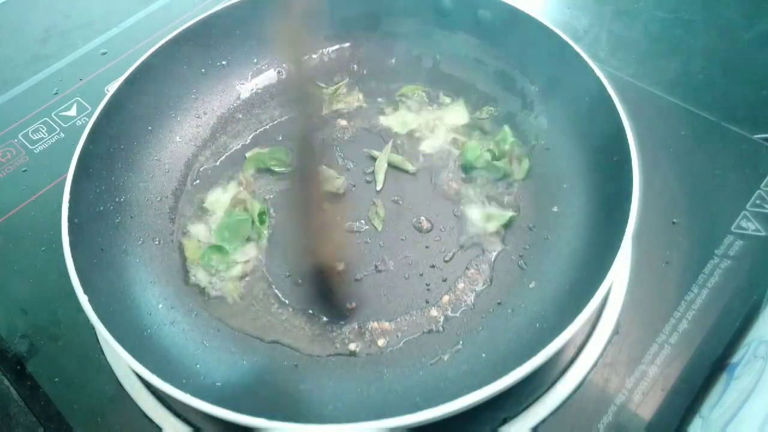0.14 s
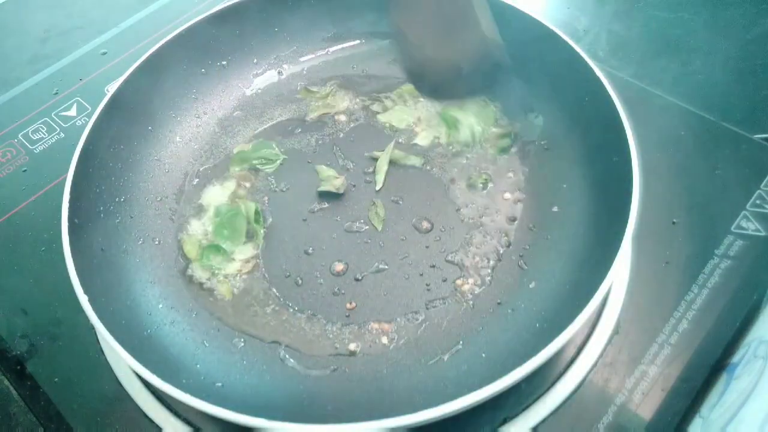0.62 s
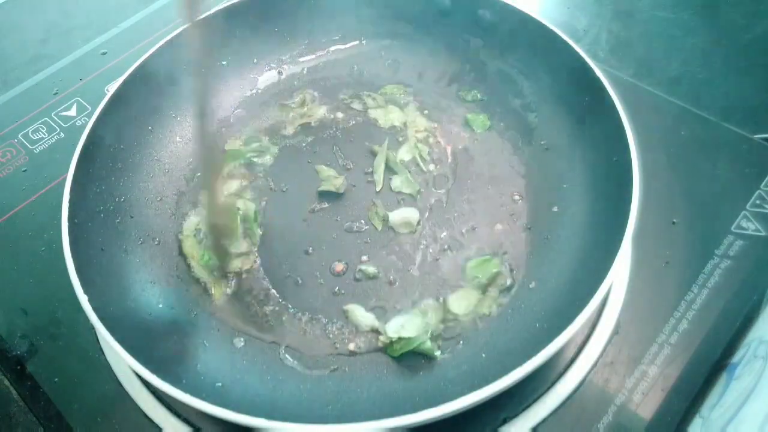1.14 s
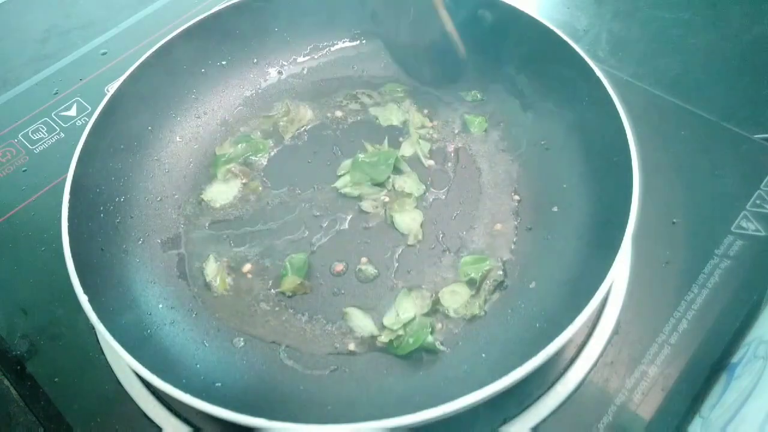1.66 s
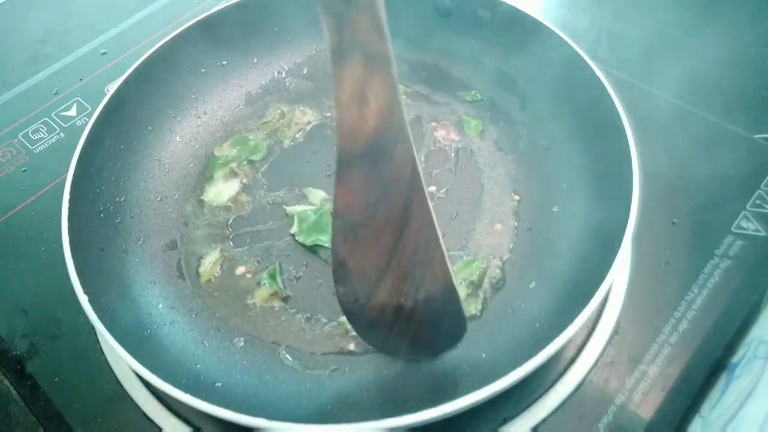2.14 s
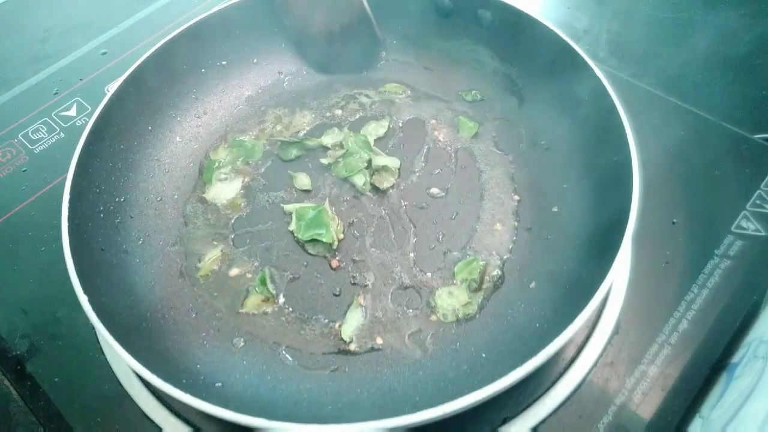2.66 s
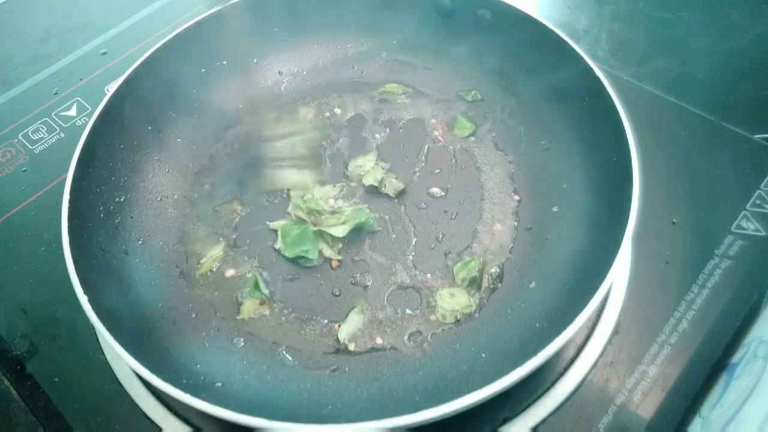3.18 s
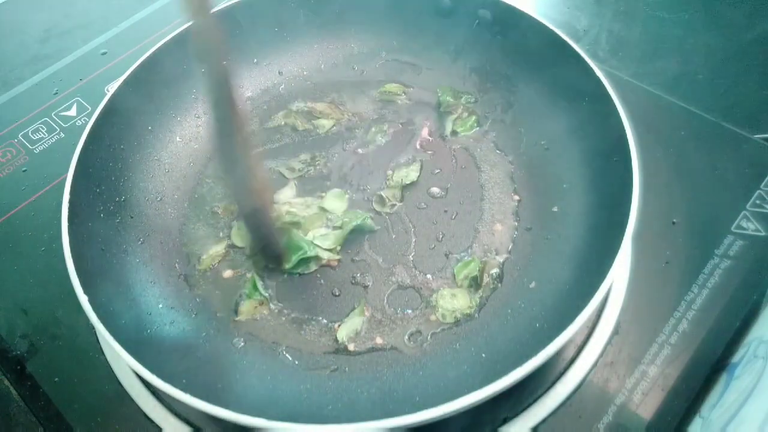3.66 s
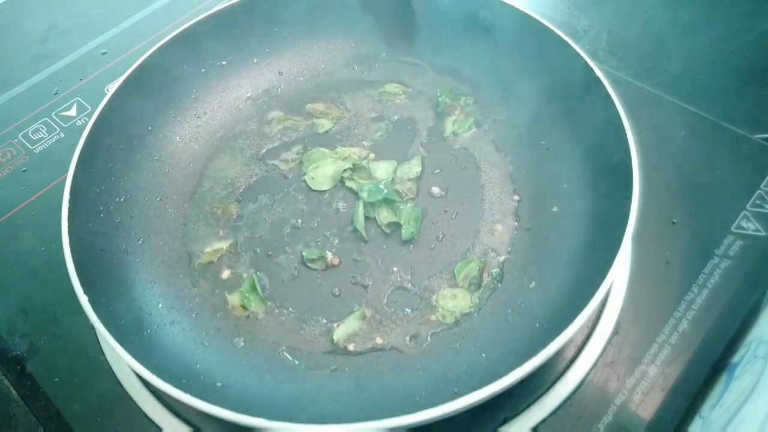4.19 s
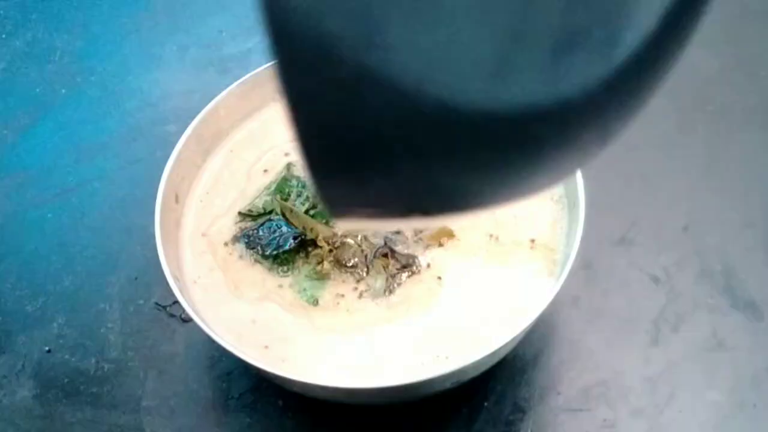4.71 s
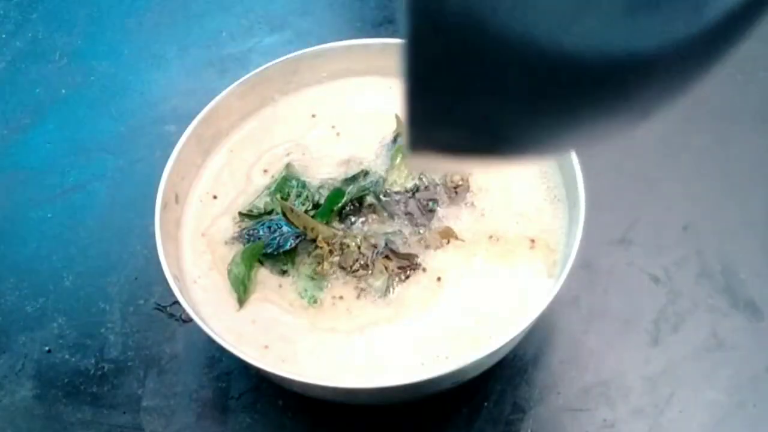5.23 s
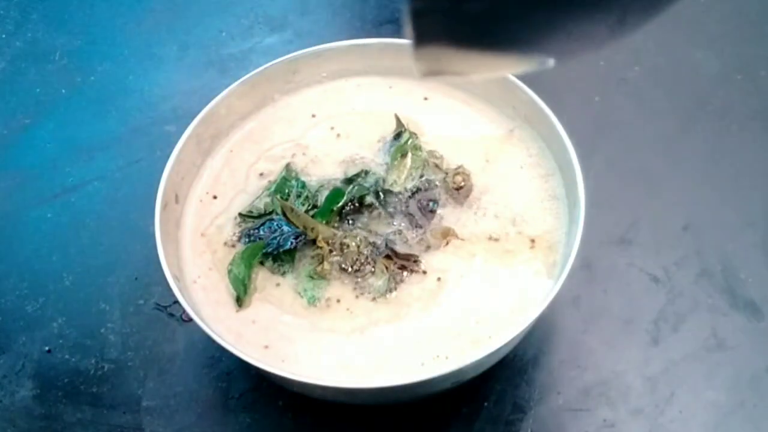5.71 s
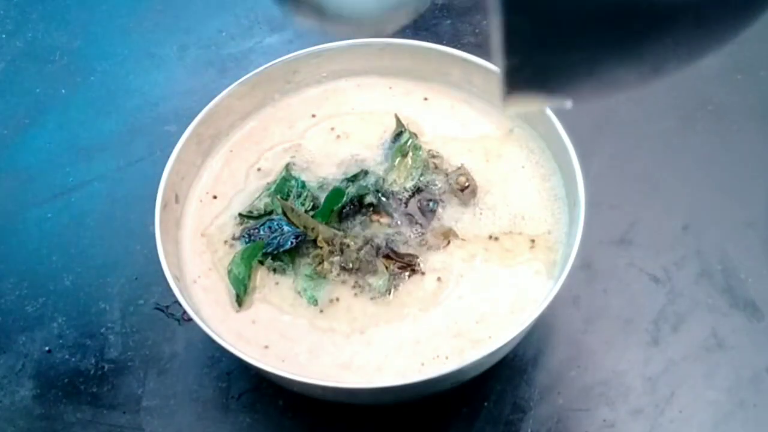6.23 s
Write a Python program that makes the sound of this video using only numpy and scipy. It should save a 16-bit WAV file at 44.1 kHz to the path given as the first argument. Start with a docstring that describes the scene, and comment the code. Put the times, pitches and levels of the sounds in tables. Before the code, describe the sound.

Lively crackling frying with dry wooden taps on a pan fades and cuts to quieter steel clinks and raspy scraping over a bowl.

```python
"""Kitchen, electric hob: spices and leaves fry in a pan. Oil fizzes (noise in random grains), water pockets pop
(short sine bursts), a wooden spatula knocks the pan (decaying modes), the hob fan hums (noise and harmonics).
This fades out; then, quieter, the pan is scraped out over a steel bowl off to the right (jolts through resonances).
Two microphone ports a few centimetres apart, dull above 8 kHz."""
import sys
import numpy as np
from scipy import signal
from scipy.fft import rfft, irfft, next_fast_len
from scipy.io import wavfile
from scipy.ndimage import uniform_filter1d, map_coordinates

SR = 44100
rng = np.random.default_rng(int(sys.argv[2]) if len(sys.argv) > 2 else 0)


def gain_from_db(level_db):
    """Convert decibel levels to linear amplitude factors (20 dB per decade)."""
    decades = np.asarray(level_db, float) / 20
    return 10 ** decades


def master(y):
    """Save y as 16-bit WAV."""
    cut = np.clip(np.atleast_2d(y).T, -1, 1)
    pcm = np.round(cut * 32767)  # scale
    wavfile.write(sys.argv[1], SR, pcm.astype(np.int16))


N = 280016
T = np.arange(N) / SR
PORT_LAG_S = 0.00012
CUT_S, BOWL_FROM_S = 4.678, 4.697  # frying ends, bowl starts

# bright snaps of bursting water pockets: (time [s], relative level [dB], pitch [Hz], left minus right [dB])
SNAPS = [(0.0059, -17.5, 4820, 18.5), (0.0353, -31, 7110, 1), (0.045, -14, 4630, 2),
         (0.129, -16.5, 6700, -5), (0.1407, -22, 6550, -8), (0.1422, -13, 6450, -23.5),
         (0.1474, -26, 6850, -10), (0.1843, -15, 6120, -2.5), (0.219, -25, 6850, -4.5),
         (0.236, -17, 5990, 1), (0.2467, -11.5, 6180, -18), (0.2501, -14, 6200, 4.5),
         (0.2536, -10, 6240, 0.5), (0.2694, -8.5, 7000, -1.5), (0.3294, -4.5, 5540, 0.5),
         (0.407, -19.5, 6940, -15.5), (0.417, -19.5, 7700, -11), (0.43, -28.5, 7240, -9),
         (0.4859, -15, 4700, 5), (0.5033, -27.5, 6440, -4), (0.5066, -19.5, 7050, 3),
         (0.56, -19, 4910, -16.5), (0.57, -28.5, 4870, -13), (0.61, -22.5, 7040, -8),
         (0.6274, -29.5, 5800, -17), (0.652, -35.5, 5900, -18), (0.658, -48.5, 6850, -19),
         (0.7336, -17.5, 5560, -13), (0.7379, -8.5, 5900, 2), (0.7922, -16, 6400, -2),
         (0.847, -23, 5900, -15), (0.8782, -20, 6200, -15), (0.913, -8, 5650, 3), (1.0055, -12.5, 6680, -4),
         (1.0518, -17, 6260, -4.5), (1.069, -7, 6220, -3), (1.0895, -17.5, 7000, -10.5),
         (1.128, -19, 4430, 3), (1.1386, -24, 6560, -4.5), (1.147, -17, 5300, -1), (1.174, -17, 4480, -9.5),
         (1.219, -25.5, 6300, -13), (1.241, -44, 6590, -7), (1.322, -14.5, 7040, -1),
         (1.3402, -11.5, 5700, 4), (1.3697, -33, 6360, -4), (1.3824, -33, 6350, -6.5),
         (1.3986, -42, 5750, -4), (1.439, -23.5, 6350, -1.5), (1.464, -30.5, 5770, -2),
         (1.498, -29.5, 5750, -9.5), (1.5052, -33.5, 7000, -10.5), (1.5472, -15, 6700, -5.5),
         (1.567, -17.5, 5860, 1.5), (1.5938, -23, 6500, 15.5), (1.6114, -24.5, 7000, -4.5),
         (1.6355, -30.5, 5030, 3.5), (1.6513, -5, 4800, -1), (1.7439, -18, 7440, -10),
         (1.765, -13.5, 6600, 8), (1.7715, -16.5, 5730, 5), (1.792, -27.5, 6440, 2.5),
         (1.8226, -18.5, 6140, 5), (1.872, -19.5, 5400, 1.5), (1.8747, -27.5, 5600, -1),
         (1.8868, -30.5, 5800, -6), (1.8903, -30, 6800, -5.5), (1.963, -29, 6870, -1),
         (1.9867, -23.5, 6400, 2.5), (1.993, -22, 4840, -2.5), (2.0104, -31, 7200, -6),
         (2.0676, -30, 6600, -15), (2.123, -25.5, 7260, -4), (2.143, -22.5, 6400, -4),
         (2.208, -23, 6700, -10), (2.2625, -25.5, 6040, 0), (2.2708, -21, 7100, -3.5),
         (2.2943, -12, 7150, -6), (2.322, -13.5, 7600, 17), (2.366, -24, 7050, -4), (2.403, -25, 7100, -11),
         (2.4763, -31.5, 6000, -17), (2.5686, -28.5, 6480, -14), (2.594, -27.5, 7360, -2),
         (2.6252, -26.5, 7260, -16), (2.6513, -25, 6550, -8), (2.6552, -18, 5170, -11),
         (2.661, -19.5, 5160, -13), (2.6645, -16, 7000, -8), (2.7084, -17, 5150, -3.5),
         (2.7148, -23.5, 6200, -21), (2.7893, -14, 5900, -19), (2.801, -28.5, 4800, -14),
         (2.8761, -35.5, 6500, -11), (2.946, -36, 6960, -6.5), (2.9614, -38, 6800, 1.5),
         (2.9756, -21, 6870, -3), (3.005, -15.5, 4800, 5.5), (3.013, -17, 4830, 0.5),
         (3.0523, -21, 5900, -12), (3.1137, -10, 5400, -5), (3.1139, -17.5, 7160, -5),
         (3.133, -20, 6400, -8), (3.235, -19, 6430, -12), (3.2514, -14, 5800, 0), (3.2969, -19, 7600, -13),
         (3.3632, -34.5, 5470, -12.5), (3.42, -15, 5200, 10), (3.422, -13.5, 7000, -6),
         (3.468, -23.5, 5170, 10), (3.4913, -31, 6100, -8), (3.4994, -24, 7300, -18),
         (3.5492, -15.5, 7040, -12), (3.563, -16.5, 4360, -4), (3.5946, -14, 5230, 7.5),
         (3.6016, -11.5, 6270, -5), (3.606, -25, 6270, -3), (3.6742, -21.5, 7170, -16),
         (3.6934, -36, 6900, -11), (3.7012, -30, 5900, -15), (3.732, -35, 6700, -15),
         (3.778, -34, 7000, -13), (3.802, -30, 6500, -4), (3.8083, -17.5, 6650, 0),
         (3.844, -15, 7600, -2.5), (3.852, -18.5, 4620, 5), (3.873, -19, 6700, -15),
         (3.9542, -31, 7000, -20), (3.99, -25, 7150, -6), (4.0125, -32.5, 6230, -13),
         (4.0339, -26, 6600, -9.5), (4.038, -21, 4780, 7), (4.106, -40, 6600, -12),
         (4.1841, -33, 6970, -11), (4.1996, -27.5, 4350, 7), (4.2191, -19, 7000, -2),
         (4.283, -30.5, 6870, -5), (4.3343, -40.5, 7080, -14), (4.341, -46, 5300, -10),
         (4.3637, -29.5, 6120, -7), (4.3756, -33.5, 6680, -14), (4.4744, -44, 7020, -8),
         (4.5687, -53, 7340, -10), (4.593, -66, 6130, -16), (5.3057, -35.5, 6980, -5),
         (5.502, -31, 5640, -6), (5.522, -25, 7340, -6), (5.623, -28.5, 4930, 1), (6.163, -43, 7240, -13),
         (6.192, -38, 7600, -10), (6.302, -32.5, 7600, -5)]
# notes of the pan's bottom: (frequency [Hz], relative level [dB], t60 [s])
PAN_BOTTOM = [(303, -8, .1), (336, 0, .14), (405, -4, .1)]
# ring modes of the pan: (frequency [Hz], relative level [dB], t60 [s])
PAN_MODES = [(481, 1, 0.044), (583, -7.5, 0.18), (699.2, -6.5, 0.33), (748, -6.5, 0.17), (876.5, -7, 0.13),
             (960, -9, 0.12), (1010, -7.5, 0.18), (1300, -7.5, 0.099), (1382, -7, 0.13),
             (2240, -14.5, 0.21)]
# steel bowl, main note: (frequency [Hz], width [Hz], relative level [dB])
BOWL = [(1347, 8, 0), (1375, 18, -8), (1250, 200, -8), (1530, 80, -14), (969, 30, -10), (797, 20, -14)]
# steel bowl, overtones: (frequency [Hz], width [Hz], relative level [dB])
BOWL_HIGH = [(2905, 25, -2), (3390, 36, -10), (4770, 55, -4), (5300, 33, 0), (6670, 45, -5),
             (2510, 86, -18)]


def read(table):
    """Columns of a curve per sample."""
    s, *columns = np.transpose(table)
    return [np.interp(T, s, c) for c in columns]


def unit(x):
    """Scale to rms 1."""
    return x / np.sqrt(np.mean(x ** 2))


def colour(x, points, lag_s=0.):
    """Shape by (Hz, dB) points, log-frequency interpolation, and delay."""
    size = next_fast_len(N)
    hz = np.arange(size // 2 + 1) * SR / size + 0.00087  # offset avoids log(0)
    f, db = np.transpose(points)
    gain = gain_from_db(np.interp(np.log(hz), np.log(f), db))
    delay = np.exp(-2j * np.pi * hz * lag_s)
    return irfft(rfft(x, size) * gain * delay, size)[..., :N]


def ring(x, hz, width_hz):
    """One resonance, gain 1 at its centre."""
    return signal.lfilter(*signal.iirpeak(hz, hz / width_hz, SR), x)


def walk(rate_hz):
    """Random level in straight ramps, a new target every 1 / rate_hz; spread near 1."""
    k = int(SR / rate_hz)
    return uniform_filter1d(np.repeat(rng.standard_normal(N // k + 1), k), k)[:N]


def sides(pan_db):
    """Gains of the two ports (left minus right in dB), mean 1."""
    gain = gain_from_db(np.array([pan_db, -pan_db]).reshape(2, -1) / 2)
    return gain / gain.mean(0)


def ports(points, alike):
    """Coloured noise: a share reaches both ports, the left one later; the rest is each port's own."""
    shared, own = rng.standard_normal(N), rng.standard_normal((2, N))
    alike = np.clip(alike, 0, 1)
    both = np.array([colour(shared, points, PORT_LAG_S), colour(shared, points)])
    return unit(np.sqrt(alike) * both + np.sqrt(1 - alike) * colour(own, points))


def bubbles(rate_hz, spread_db, tail_s):
    """Envelope of many small bursts of very uneven size, rms 1."""
    size = (rng.random(N) < rate_hz / SR) * gain_from_db(spread_db * rng.exponential(size=N))
    swell = uniform_filter1d(size ** 2, int(tail_s * SR / 3)).clip(0)
    power = signal.lfilter([1], [1, -np.exp(-2 / (tail_s * SR))], swell)
    return unit(np.sqrt(power))


def burst(t, rise_s):
    """Rounded swell and fall, peak 1 at twice rise_s."""
    return (t / rise_s / 2) ** 2 * np.exp(2 - t / rise_s)


def add(out, s, sound):
    """Mix a short two-channel sound in at s."""
    i = int(s * SR)
    out[:, i:i + sound.shape[1]] += sound[:, :N - i]


def frying_gain():
    """Gain of the frying scene: a fade, then the cut."""
    from_s, to_s, power = 3.575, 5.04, 2.27
    fade = np.clip((to_s - T) / (to_s - from_s), 0, 1) ** power
    return fade * np.clip((CUT_S - T) * 200, 0, 1)


def bowl_gain():
    """Gain of the steady sounds after the cut."""
    rise_s = 0.011
    return np.clip((T - BOWL_FROM_S) / rise_s, 0, 1)


def rumble():
    """Air stirring at each port: deep noise, independent left and right, slowly varying."""
    # spectrum: (frequency [Hz], relative level [dB])
    rumble_points = [(15, -11.5), (40, 6), (80, -6.5), (130, -28.5), (300, -73.5)]
    level = gain_from_db(-70.5 + 3.0 * walk(4.2)) * (frying_gain() + 0.22 * bowl_gain())
    return level * ports(rumble_points, 0)


def hob():
    """Fan rush with wavering multiples of twice the mains frequency."""
    # fan rush spectrum: (frequency [Hz], relative level [dB])
    rush_points = [(15, -57.5), (25, -42), (75, -30.5), (171, -1.5), (247, -13.5), (398, 1.5), (453, -19.5),
                   (496, -3.5), (554, -8.5), (703, -7), (2000, -24.5), (2600, -18.5), (4400, -120)]
    # hum lines: (multiple of hum_hz [1], relative level [dB])
    hum_lines = [(2, -63), (3, -56), (4, -51), (5, -54), (6, -63), (7, -58), (8, -55), (9, -61), (11, -63),
                 (13, -70), (17, -66)]
    hum_hz, hob_db, lines_db = 100.6, -44, -1.5  # lines relative to rush
    lines = 0
    for k, db in hum_lines:
        tone = np.sin(2 * np.pi * k * hum_hz * T + 3 * rng.standard_normal())
        lines = lines + gain_from_db(db + 2.4 * walk(16)) * tone
    gusts = gain_from_db(1.8 * walk(11))
    rush = gusts * ports(rush_points, 0.58)
    return gain_from_db(hob_db) * frying_gain() * (rush + gain_from_db(lines_db) * unit(lines))


def kitchen():
    """Quiet room tone around the bowl: steady noise, mostly shared by the ports."""
    # spectrum: (frequency [Hz], relative level [dB])
    room_points = [(15, -88), (25, -47), (182, -1), (324, -14.5), (350, -3.5), (425, -5), (612, -16),
                   (772, -5), (900, -19.5), (1320, -12), (2500, -27), (3250, -68), (5500, -120)]
    return gain_from_db(-55.5) * bowl_gain() * ports(room_points, 0.89)


def bowl_note(modes, t):
    """Sum of freely decaying modes; a wider mode dies sooner."""
    note = 0
    for hz, width_hz, db in modes:
        tone = np.sin(2 * np.pi * hz * t + 9 * rng.random())
        note = note + gain_from_db(db) * tone * np.exp(-np.pi * width_hz * t)
    return note


def taps():
    """The pan's rim taps the bowl: clear notes; each new touch stills the ring before it."""
    # taps: (time [s], relative level [dB], overtones re main note [dB])
    tap_rows = [(4.866, -43, -8), (4.921, -33, -12), (4.934, -26, -10), (4.95, -25, -17), (4.985, -33, -20),
                (5.012, -42, -14), (5.035, -56, -10), (5.352, -50, -20), (5.621, -44, 6), (5.648, -60, 6)]
    rise_s, still_s = .002, .003  # stilled this long before the next tap
    out, t = np.zeros((2, N)), T[:14000]
    ends = [row[0] for row in tap_rows[1:]] + [T[-1]]
    for (s, db, high_db), end in zip(tap_rows, ends):
        held = (1 - np.exp(-t / rise_s)) * np.exp(-np.maximum(t + s - end + still_s, 0) / rise_s)
        level = gain_from_db(db + 2 * walk(70)[:len(t)])
        note = bowl_note(BOWL, t) + gain_from_db(high_db) * bowl_note(BOWL_HIGH, t)
        add(out, s, level * held * sides(-9.0) * note)
    return out


def scrape():
    """Uneven jolts, mostly stick-slip rubbing, ring the bowl and the pan's edge; the right port faces them."""
    # edge rasp of the pan: (frequency [Hz], width [Hz], relative level [dB])
    edge = [(4940, 27, 1.5), (5160, 63, 0.5), (5360, 39, -4.5), (7110, 97, -2.5), (6700, 44, -4),
            (5850, 79, -13), (6440, 36, -14), (3200, 110, -18), (7800, 57, -14), (7000, 20000, -22.5)]
    # edge rasp, pressed hard: (frequency [Hz], width [Hz], relative level [dB])
    edge_hard = [(4680, 41, 6), (5900, 470, 0), (6350, 120, -4), (5300, 30, -2), (3840, 68, -3),
                 (2394, 29, 1.5), (11000, 5000, -36)]
    # low rasp: (frequency [Hz], width [Hz], relative level [dB])
    edge_low = [(656, 14, 4), (804, 22, 8), (1210, 5.2, 10.5), (1206, 57, -6.5), (1000, 1900, -25.5)]
    # the pan's lip: (frequency [Hz], width [Hz], relative level [dB])
    lip = [(2210, 50, 0), (2910, 45, 0), (1340, 150, -5), (1800, 120, -7), (4810, 70, -2),
           (2400, 1800, -17)]
    # bowl overtone that a light touch wakes alone: (frequency [Hz], width [Hz], relative level [dB])
    bowl_ping = [(2915, 24, 0), (3040, 120, -9)]
    # share of each body per kind of sound: (bowl note [dB], bowl overtones [dB], edge rasp [dB],
    # hard-pressed rasp [dB], low rasp [dB], lip [dB], ping [dB])
    contacts = {"rim": (0, -10, -14, -29, -30, -30, -16), "tick": (-12.5, -11, -5, -14, -9, -2, -17),
                "slide": (-24.5, -21, -0.5, -34, -16, -36.5, -27),
                "ping": (-13.5, -23, -30, -34, -10, -30, -2), "press": (-17, -16, 0.5, 0.5, -2, -18, -26),
                "clank": (-6, 1, -11, -15, -14, -21, -16), "strike": (-21, -11, -5, -24, -13.5, 0.5, -9)}
    # steel rubbed on steel, and a few short clicks:
    # (peak time [s], rise over 20 dB [s], fall over 20 dB [s], level [dB], kind of sound)
    strokes = [(4.742, 0.015, 0.032, -49.5, "slide"), (4.76, 0.051, 0.064, -50.5, "slide"),
               (4.87, 0.0067, 0.039, -50.5, "clank"), (4.915, .012, 0.013, -47, "clank"),
               (4.934, 0.03, 0.04, -37, "clank"), (4.931, 0.034, 0.03, -42.5, "rim"),
               (4.96, .05, .085, -48.5, "press"), (5.015, .01, .02, -52, "slide"),
               (5.245, .003, 0.01, -44, "ping"), (5.325, .035, 0.025, -55.5, "ping"),
               (5.4, 0.05, 0.06, -58, "rim"), (5.389, 0.003, 0.01, -65, "press"),
               (5.54, 0.003, 0.012, -54, "press"), (5.567, 0.0035, 0.014, -55, "press"),
               (5.624, .003, 0.03, -36.5, "strike"), (5.636, 0.012, 0.016, -42, "slide"),
               (5.668, 0.018, 0.015, -45.5, "tick"), (5.85, 0.03, 0.063, -40.5, "slide"),
               (5.855, 0.042, 0.044, -49, "ping"), (5.84, 0.056, 0.048, -51, "clank"),
               (6.064, .02, .025, -43, "rim"), (5.887, 0.0089, 0.011, -41, "slide"),
               (5.915, 0.053, 0.086, -32.5, "slide"), (5.944, 0.022, 0.03, -34, "slide"),
               (5.97, 0.022, 0.016, -36.5, "slide"), (6.0, .04, 0.055, -39.5, "slide"),
               (5.96, .06, .04, -56, "ping"), (6.043, 0.013, 0.043, -42, "press"),
               (6.068, 0.077, 0.054, -36, "press"), (6.094, 0.04, 0.028, -42.5, "press")]
    stroke_round = 1.3  # 1 pointed, 2 rounded
    wander_db, wander_s = 2.5, .0002  # modes come and go and bend in pitch as grip and angle shift
    bodies = ((BOWL, -3), (BOWL_HIGH, -5), (edge, -20), (edge_hard, -18),
              (edge_low, -7), (lip, -8), (bowl_ping, -5))  # (modes, left minus right dB)
    a = int(BOWL_FROM_S * SR)
    t = T[a:]
    slips = (bubbles(1600, 1.6, .002) * gain_from_db(2.8 * walk(70)) * rng.standard_normal(N))[a:]
    force = 0  # one row per body
    for s, rise, fall, db, kind in strokes:
        drop_db = 20 * np.maximum((s - t) / rise, (t - s) / fall) ** stroke_round
        force = force + gain_from_db(np.array(contacts[kind])[:, None] + db - drop_db)
    out = np.zeros((2, N))
    for (modes, pan_db), push in zip(bodies, force):
        drive = np.array([slips, slips * push])  # the steady one sets the scale
        steady, played = sum(gain_from_db(db + wander_db * walk(25)[a:]) * ring(drive, hz, width_hz)
                             for hz, width_hz, db in modes)
        bend_s = wander_s * (modes is not BOWL) * walk(18)[a:]  # the main note stays in tune
        bent = map_coordinates(played, [(t - t[0] + bend_s) * SR], mode="mirror")
        add(out, BOWL_FROM_S, sides(pan_db) * bent / steady.std())
    return out


def crackle(rate_hz, spread_db, width_hz):
    """Sparse bubbles of many sizes, each a few cycles at its own pitch, not quite the same at the two ports."""
    out = 0
    for hz in np.geomspace(4300, 7800, 9):
        size = gain_from_db(spread_db * np.minimum(rng.exponential(size=N), 2.2))
        clicks = (rng.random(N) < rate_hz / SR) * size
        port_hz = hz * (1 + 0.074 * rng.standard_normal(2))
        out = out + np.array([ring(ring(clicks, f, width_hz), f, width_hz) for f in port_hz])
    return unit(out)


def fizz():
    """Steam bubbles burst in the oil, in spurts, swelling as it is stirred; every listed snap sets off a flurry."""
    # fizz curve: (time [s], treble level [dB], mid level [dB], left minus right [dB])
    fizz_curve = [(0.0, -27, -31, -1), (0.16, -42, -52, -5), (0.18, -54, -72, 1), (0.39, -29.5, -37.5, 0.5),
                  (0.52, -38.5, -39.5, -4), (0.56, -44.5, -57, -4), (0.8, -38, -42, -1),
                  (0.86, -36.5, -39, -3), (0.94, -34, -41, 0), (1.19, -39.5, -36, -2.5),
                  (1.32, -33, -45, -1.5), (1.42, -39, -43, -3), (1.53, -40.5, -49, -2),
                  (1.58, -29.5, -41, 3), (1.7, -38.5, -39.5, -1), (1.95, -44, -49, -2),
                  (2.12, -36, -42, -2), (2.29, -36, -36.5, -2), (2.34, -38, -40.5, -2.5),
                  (2.5, -39.5, -46, -4), (2.63, -38.5, -45, -5), (2.67, -36, -45, -7.5),
                  (2.82, -44.5, -54, -3), (2.93, -47, -57, -2), (3.01, -43, -51, 2), (3.05, -40, -44, -8),
                  (3.14, -32, -35, 4), (3.35, -43.5, -49.5, -3), (3.5, -37, -37.5, -2),
                  (3.65, -33, -42, 0.5), (3.74, -45, -51, -4.5), (3.88, -33, -36.5, 2.5),
                  (3.96, -44.5, -57.5, -2.5), (4.1, -44, -63.5, -7), (4.25, -41.5, -39, 5.5),
                  (4.32, -52.5, -57.5, -1.5), (4.4, -47.5, -47, -7), (4.5, -46.5, -56.5, 0.5),
                  (4.65, -55.5, -65, -1.5)]
    # treble spectrum: (frequency [Hz], relative level [dB])
    treble_points = [(3300, -35), (4100, 1.5), (5000, 5), (6500, 8.5), (8000, 6), (11000, 2), (12500, -2),
                     (16000, -5)]
    # mid spectrum: (frequency [Hz], relative level [dB])
    mid_points = [(500, -6), (1000, -0.5), (1500, -3), (2500, 1), (3800, 7), (4600, -42.5)]
    bowl_treble_db, bowl_mid_db = -57, -62.5  # what still fizzes over the bowl
    treble_db, mid_db, pan_db = read(fizz_curve)
    frying, bowl = frying_gain(), bowl_gain()
    kicks = np.zeros(N)
    for s, snap_db, *_ in SNAPS:
        kicks[int(s * SR)] = gain_from_db(snap_db - 27.0)
    t = T[:6000]
    swell = t / 0.014 * np.exp(1 - t / 0.013)  # builds up just after the burst
    flurry = signal.fftconvolve(kicks, swell)[:N].clip(0)
    grain = bubbles(1200, 2.4, .0035) * gain_from_db(2.8 * walk(35) + 1.5 * walk(9))
    treble_level = gain_from_db(treble_db) * frying + bowl * gain_from_db(bowl_treble_db) + flurry
    treble = treble_level * (grain * ports(treble_points, 0.021) + 0.5 * crackle(40, 3.9, 290))
    mid_level = gain_from_db(mid_db) * frying + bowl * gain_from_db(bowl_mid_db) + 0.47 * flurry
    mid = mid_level * grain * ports(mid_points, 1.0)
    return sides(np.clip(pan_db, -12, 12)) * treble + mid


def small_pops():
    """Rows like those of the listed snaps and plops for the many fainter bursts, at random."""
    pops_per_s, spread_db = 30, 6
    snap_db, plop_db, pan_db, bowl_db = -46.5, -39, -9, -8  # relative
    size = int(pops_per_s * N / SR)
    s, snap, plop = rng.random((size, 3)).T
    c = rng.standard_normal((size, 3)).T.clip(-2, 1.2)
    s = .01 + s * (T[-1] - .01)
    fade_db = 20 * np.log10(frying_gain()[(s * SR).astype(int)] + 1e-6)
    db = np.where(s < CUT_S, fade_db, bowl_db)
    snaps = zip(s, db + snap_db + spread_db * c[0], 4500 + 3200 * snap, pan_db + 5 * c[2])
    plops = zip(s, db + plop_db + spread_db * c[1], 1300 + 2000 * plop)
    return list(snaps), [row for row in plops if row[0] < CUT_S]


def pops():
    """Bright snaps a quarter cycle apart at the ports with a spray of oil, mid-pitched rising bursts, thumps."""
    # short mid-pitched bursts, plops of larger pockets and the crack in some knocks:
    # (time [s], relative level [dB], pitch [Hz])
    mid_bursts = [(0.0456, -12.5, 3130), (0.131, -27, 2440), (0.145, -25.5, 2700), (0.148, -26.5, 2950),
                  (0.1854, -29.5, 2980), (0.235, -31.0, 2650), (0.246, -21, 2670), (0.2533, -7, 2030),
                  (0.305, -13.5, 1360), (0.3278, -10.5, 1520), (0.559, -31, 3120), (0.592, -31, 2450),
                  (0.6266, -42, 2380), (0.738, -7.5, 1690), (0.8028, -11.5, 2860), (0.9128, -7, 1750),
                  (1.0046, -12, 2870), (1.0706, -13.5, 2890), (1.1279, -4, 2680), (1.2644, -10.5, 1570),
                  (1.547, -5.5, 2390), (1.568, -7.5, 3240), (1.652, -33, 2760), (1.689, -6.5, 1740),
                  (1.6927, -14.5, 1360), (1.77, -22, 1790), (1.79, -10, 2610), (1.824, -17, 2450),
                  (1.8717, -21.5, 2980), (1.9856, -29, 3010), (2.001, -26.5, 2200), (2.1425, -33, 3080),
                  (2.1794, -13.5, 1390), (2.228, -23, 3140), (2.2622, -31, 2640), (2.2707, -12, 2810),
                  (2.2933, -12, 1760), (2.3716, -6, 1360), (2.381, -15, 1310), (2.585, -18, 3190),
                  (2.5906, -23.5, 3150), (2.6506, -10, 1800), (2.7086, -41, 2930), (2.785, -14, 2800),
                  (2.7887, -24.5, 2600), (2.7995, -22.5, 2730), (2.9755, -25.5, 3000), (3.0117, -15, 2320),
                  (3.1142, -7.5, 2150), (3.1868, -19.5, 2520), (3.2353, -21, 2370), (3.2532, -12, 2660),
                  (3.297, -20, 1680), (3.4167, -6.5, 1780), (3.494, -27, 2560), (3.499, -9.5, 2550),
                  (3.5493, -10.5, 3260), (3.5625, -11.5, 2696), (3.6016, -12, 1510), (3.6066, -14.5, 1810),
                  (3.7548, -50, 1360), (3.807, -37, 1280), (3.8429, -19.5, 1350), (3.85, -20, 2920),
                  (3.8722, -24.5, 2500), (3.988, -23, 2770), (4.0349, -15, 2670), (4.197, -26.5, 2890),
                  (4.2188, -27, 2910), (4.283, -44.0, 3040), (4.3633, -53, 2700)]
    # the largest pockets thump the pan floor with one push: (time [s], relative level [dB])
    thump_rows = [(.2465, -19), (0.2538, -16), (0.329, -21), (.9126, -21), (1.005, -21), (1.0694, -19),
                  (1.128, -22), (1.547, -16), (2.293, -9), (3.0112, -26), (3.1138, -13.5), (3.2347, -21.5),
                  (3.2533, -18), (3.2972, -24), (3.499, -19), (3.808, -16), (3.843, -21.5)]
    thump_s = 0.00022
    out, t = np.zeros((2, N)), T[:900]
    small_snaps, small_plops = small_pops()
    rows = SNAPS + small_snaps
    late = np.maximum(t - np.array([[PORT_LAG_S], [0]]), 0)  # left port later
    for (s, db, hz, pan_db), c in zip(rows, rng.standard_normal((len(rows), 4))):
        turn = 9 * c[0] + np.array([[0], [np.pi / 2]]) * np.sign(c[1])
        snap = np.sin(2 * np.pi * hz * t + turn) * burst(t, 0.00029 * gain_from_db(2.5 * c[2]))
        noise = rng.standard_normal((2, len(t))) * burst(t, 0.0008)
        spray = ring(noise, 8000, 8100) * gain_from_db(3 * c[3].clip(-2, .7))
        add(out, s, gain_from_db(db - 0.5) * sides(np.clip(pan_db, -20, 20)) * (snap + 0.77 * spray))
    for s, db, hz in mid_bursts + small_plops:
        rise_s = 0.00032 * (hz / 2000) ** 1.1  # higher ones last longer
        tone = np.sin(2 * np.pi * hz * late * (1 + (late - .002) / 0.01))
        add(out, s - rise_s, gain_from_db(db - 2.5) * tone * burst(late, rise_s))
    for s, db in thump_rows:
        add(out, s, gain_from_db(db) * (burst(late, thump_s / 2) - 0.16 * burst(late, thump_s * 1.4)))
    return out


def struck(modes, t, chance, spot_hz=0):
    """Decaying modes, a little different at every blow; those near spot_hz ring most. Early rms 0.4."""
    hz, db, t60 = np.transpose(modes)[:, :, None]
    tune, spot, phase = chance.reshape(3, -1, 1)
    spot_db = 2 * spot + 11 * np.exp(-((hz - spot_hz) / 40) ** 2)
    tones = np.sin(2 * np.pi * hz * (1 + 0.008 * tune) * t + .2 * phase)
    sound = (gain_from_db(db + spot_db) * tones * 1000 ** (-t / t60)).sum(0)
    return sound / sound[:600].std() / 2.5


def drag(t):
    """The wood drags on: rubbing noise through the pan's modes, broadened, dying away; peak 1."""
    drag_s, blur = 0.044, 1.7
    rub = rng.standard_normal(len(t)) * t / drag_s * np.exp(1 - t / drag_s * 2)
    sound = sum(gain_from_db(db) * ring(rub, hz, blur * 2.7 / t60) for hz, db, t60 in PAN_MODES + PAN_BOTTOM)
    return sound / np.abs(sound).max()


def knocks():
    """Wood meets the pan: a dry crack and scuff, then the pan's modes, cut short while the wood stays pressed on."""
    # spatula on the pan: (time [s], relative ring level [dB], strongest ring [Hz],
    # relative bottom note level [dB], relative crack level [dB], rise [s], rings freely for [s])
    knock_rows = [(0.244, -22.5, 970, -42.5, -25, .0008, 0.012),
                  (0.3005, -8, 944, -28.5, -19, 0.0014, 0.013), (0.314, -19.5, 748, -19, -22, .001, 0.013),
                  (0.329, -39.5, 555, -50, -20.5, .0008, .016), (0.74, -12, 720, -22, -11, 0.00086, 0.014),
                  (1.004, -28.5, 1000, -36.5, -20.5, 0.00059, 0.011),
                  (1.263, -8, 722, -22, -15.5, 0.00069, 0.012), (1.313, -17, 740, -47.5, -25, .003, 0.022),
                  (1.544, -21, 970, -53, -30, 0.0014, 0.022),
                  (1.689, -10, 667, -22.5, -15.5, 0.00052, 0.036),
                  (2.179, -11, 748, -29.5, -28.5, .0012, 0.022), (2.203, -35, 775, -35, -32, .001, 0.017),
                  (2.3713, -14.5, 750, -46, -22.5, 0.0017, 0.017),
                  (2.651, -13.5, 704, -21.5, -14.5, 0.0011, 0.026),
                  (2.686, -21.5, 715, -21, -49, 0.0075, .028), (3.1135, -23, 1010, -48, -14, 0.001, 0.0055),
                  (3.417, -16.5, 676, -22.5, -17.5, 0.00098, 0.031),
                  (4.035, -37.5, 855, -51, -23, .0008, 0.019)]
    # the pan rocks on the glass: (time [s], relative level [dB], pitch [Hz])
    rock_rows = [(0.815, -26.5, 167.6), (2.697, -31.5, 123)]
    free_share, pressed_decay_s = .3, 0.28  # most of the ring is choked once the wood settles
    drag_db, pan_db = -15, -2
    out, t = np.zeros((2, N)), T[:12000]
    rattle = gain_from_db(1.5 * walk(120))  # the pan chatters on the glass while it rings
    low = 3 * len(PAN_BOTTOM)
    chance = rng.standard_normal((len(knock_rows), low + 3 * len(PAN_MODES)))
    for (s, ring_db, spot_hz, bottom_db, crack_db, rise, grip), c in zip(knock_rows, chance):
        choked = (1 - free_share) * np.exp(-(t / grip) ** 3) + free_share * np.exp(-t / pressed_decay_s)
        held = (1 - np.exp(-t / rise)) * choked * rattle[int(s * SR):][:len(t)]
        body = gain_from_db(ring_db + 1.0) * struck(PAN_MODES, t, c[low:], spot_hz)
        body = body + gain_from_db(bottom_db + 4.5) * struck(PAN_BOTTOM, t, c[:low])
        crack = np.sin(2 * np.pi * 1800 * t) * t / 0.0006 * np.exp(1 - t / 0.00027)
        scuff = ring(rng.standard_normal((2, len(t))) * np.exp(-t / .012), 1700, 1800)
        contact = gain_from_db(crack_db + 8.5) * (crack + 0.35 * scuff)
        add(out, s, sides(pan_db) * (held * body + gain_from_db(ring_db + drag_db) * drag(t) + contact))
    for s, db, hz in rock_rows:
        add(out, s, sides(0) * gain_from_db(db) * np.sin(2 * np.pi * hz * t) * t / 0.0092 * np.exp(1 - t / 0.01))
    return out


def wall_tail(hits):
    """Short tail from the hard kitchen walls: decaying noise as impulse response."""
    t60_s = 0.31
    walls = rng.standard_normal((2, 9000)) * 1000 ** (-T[:9000] / t60_s)
    return gain_from_db(-38) * signal.fftconvolve(hits, walls, axes=1)[:, :N]


def scene():
    """All sources; the knocks and pops lose deep bass and top and get a wall tail."""
    hit_points = [(30, -45), (100, -16), (250, -8), (300, 0), (7800, 0), (8300, -5), (20000, -5)]  # (Hz, dB)
    hits = colour(pops() + knocks(), hit_points)
    background = rumble() + hob() + kitchen()
    return background + taps() + scrape() + fizz() + hits + wall_tail(hits)


def low_pass(x):
    """Removes everything above the highest recorded frequency."""
    return signal.sosfilt(signal.butter(12, 16820, fs=SR, output="sos"), x)


def record(dry):
    """Microphone: little bass, a notch under 4 kHz, a step down in the treble at 8 kHz and a steep top."""
    mic_points = [(20, -9), (110, 0), (3020, 0), (3620, -5), (4120, 0), (7910, 0), (7950, -6),
                  (15600, -6), (16000, -30), (16900, -60)]  # (Hz, dB)
    mix = colour(dry, mic_points)
    return low_pass(mix)


dry = scene()
out = record(dry)
master(out)
```